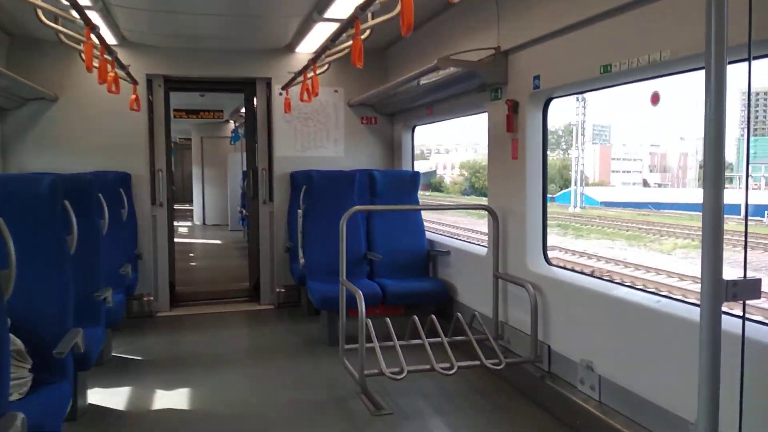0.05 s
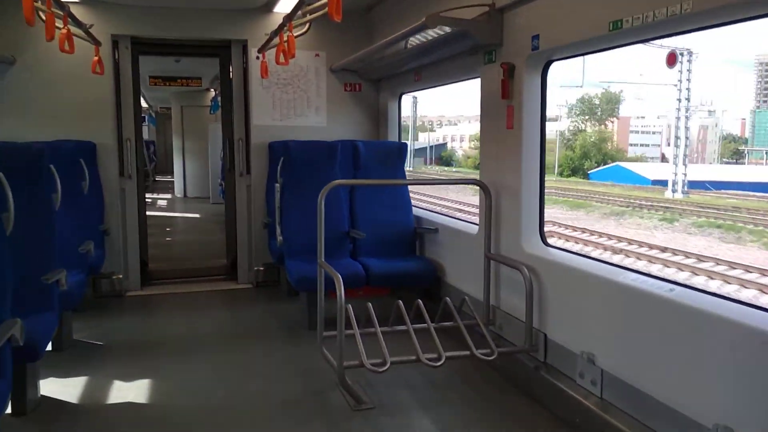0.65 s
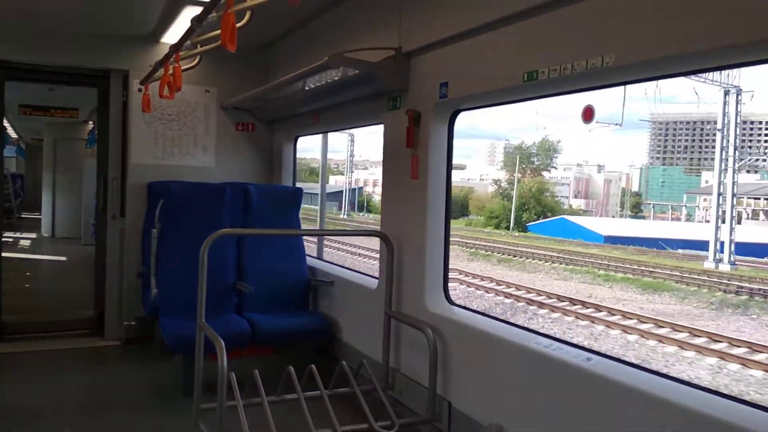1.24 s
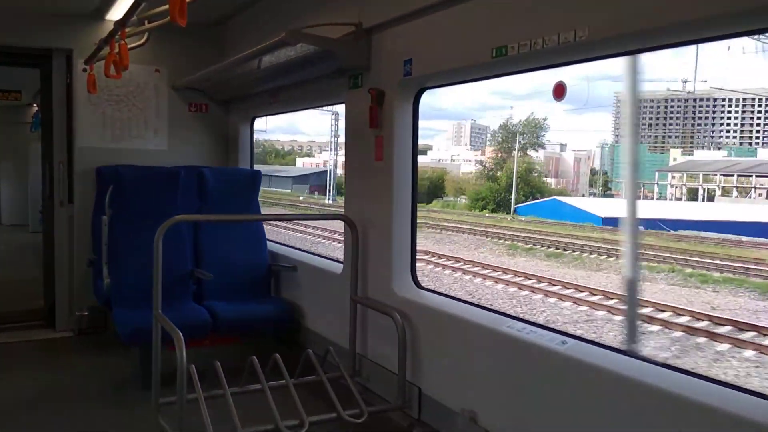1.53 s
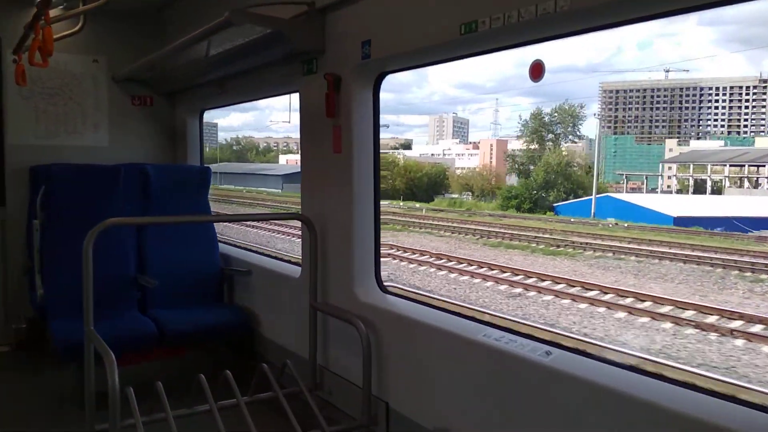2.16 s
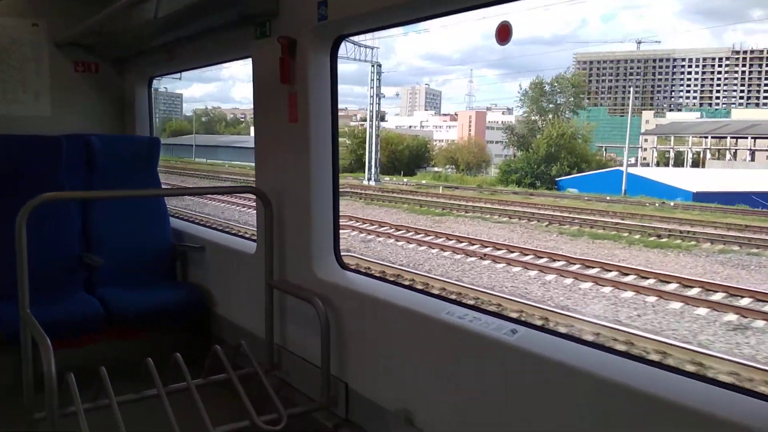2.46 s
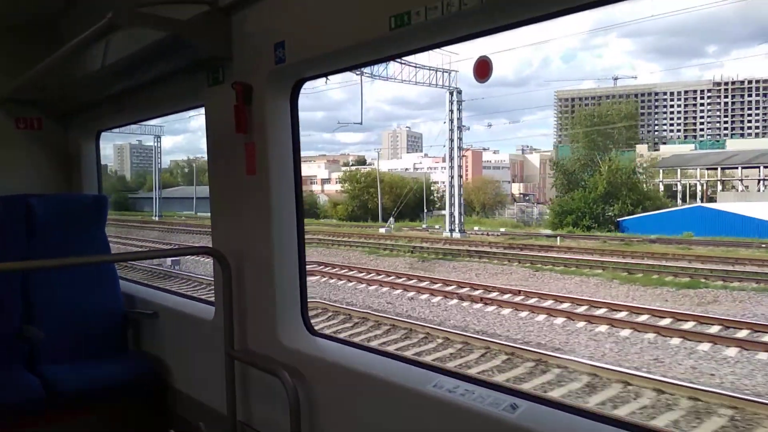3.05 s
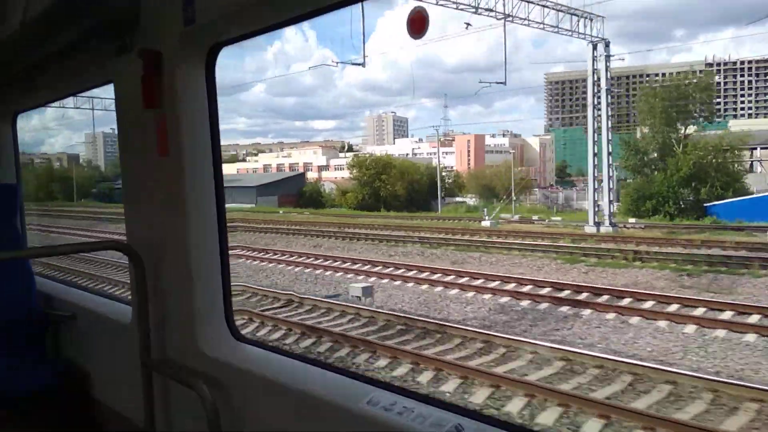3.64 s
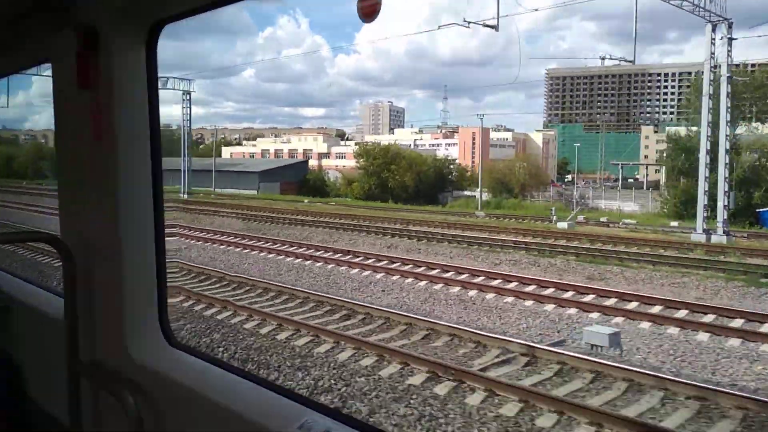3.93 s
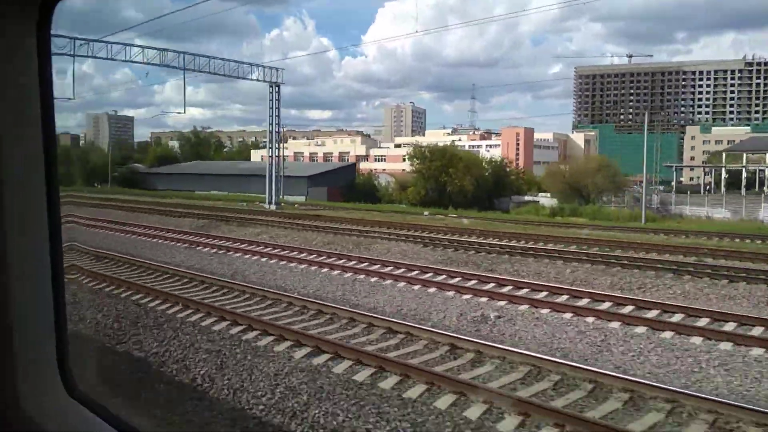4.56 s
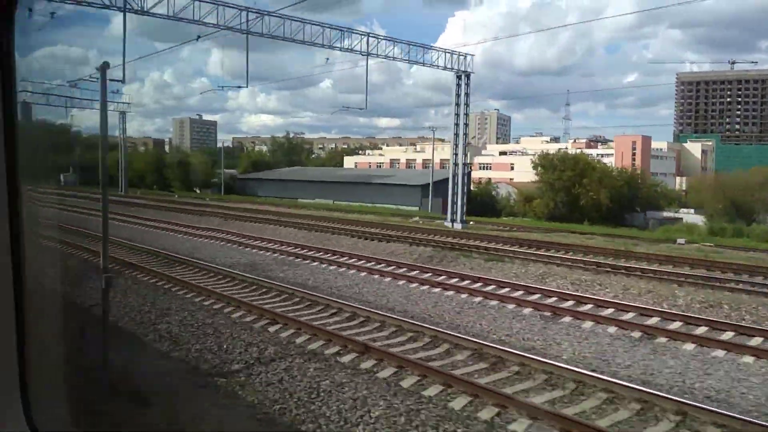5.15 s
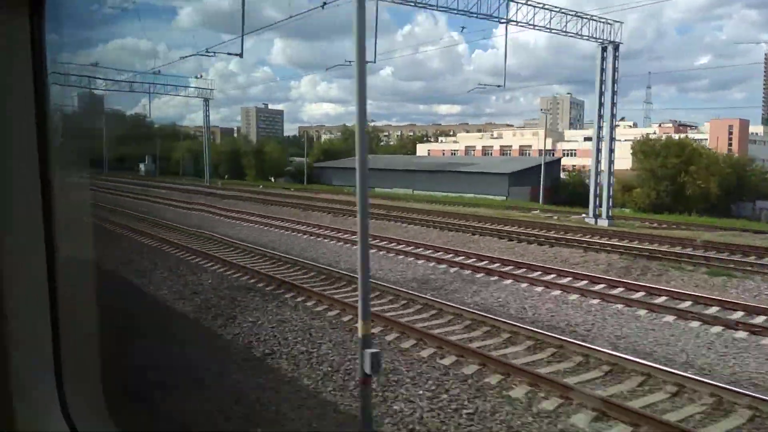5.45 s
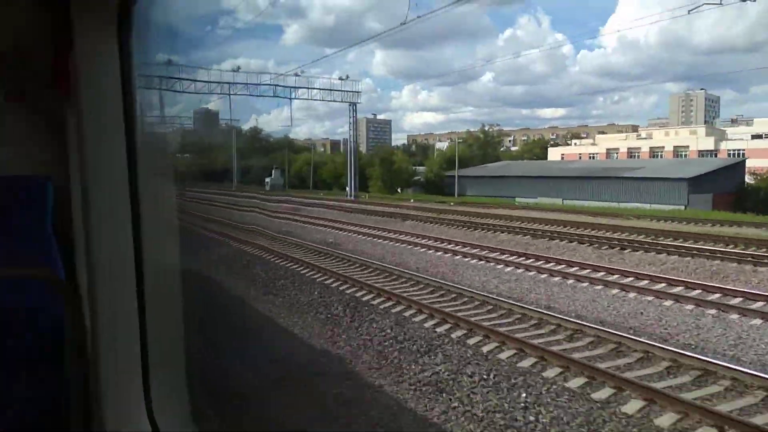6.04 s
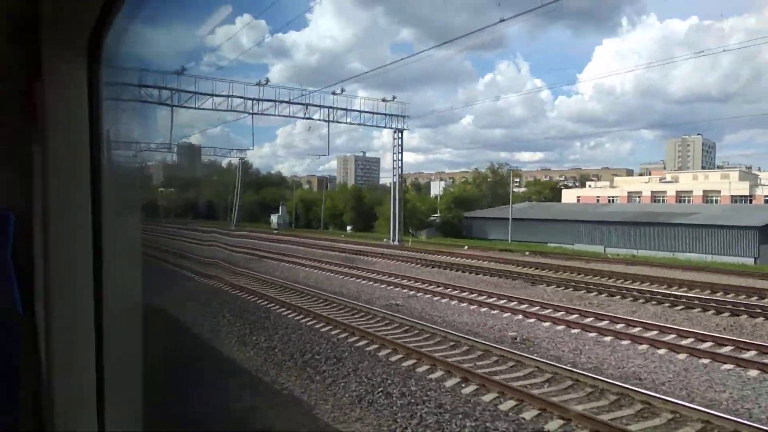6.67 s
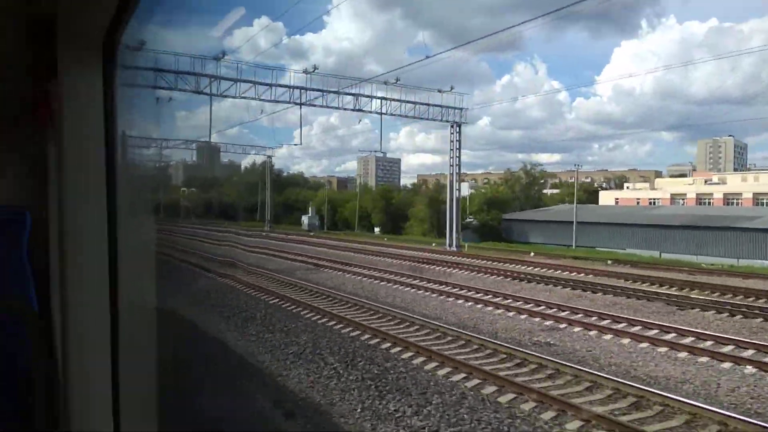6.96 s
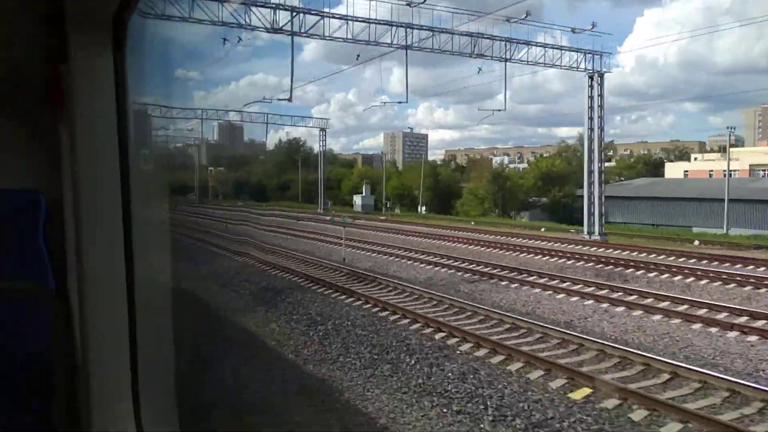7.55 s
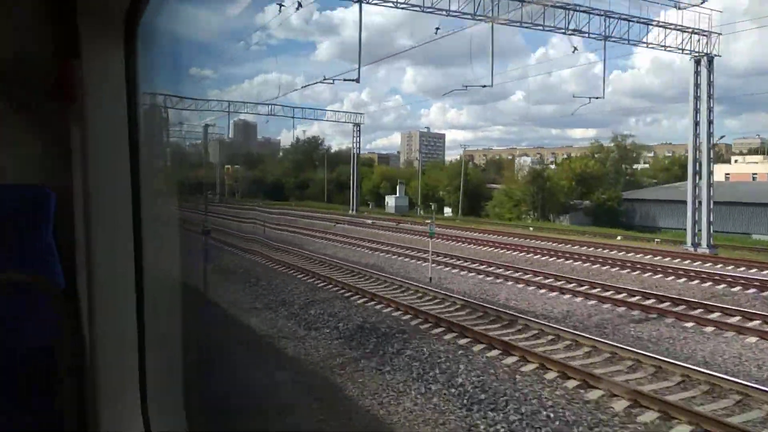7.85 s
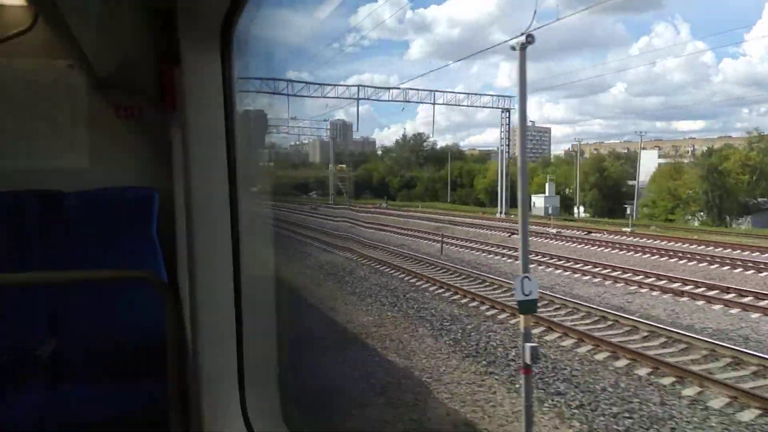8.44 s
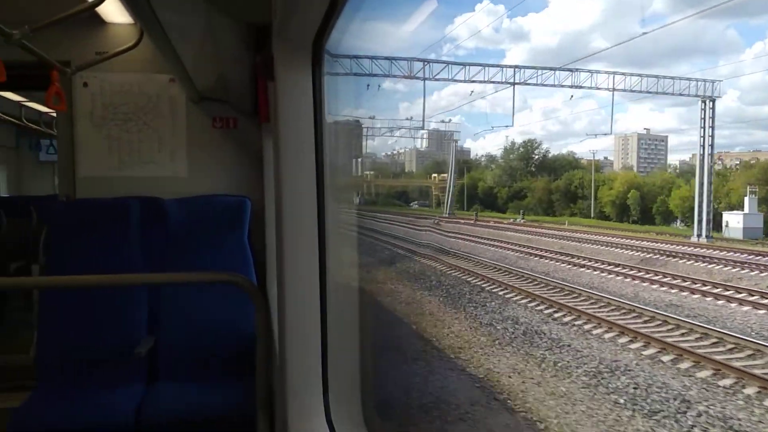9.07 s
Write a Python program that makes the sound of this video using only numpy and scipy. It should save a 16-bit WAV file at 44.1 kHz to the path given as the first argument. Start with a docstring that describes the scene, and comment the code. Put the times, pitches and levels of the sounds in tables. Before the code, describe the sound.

A deep rumble fills the carriage of a moving electric train, throbbing with quick, even wheel thuds. It starts fairly quiet in the aisle, then swells by the window, joined by a faint whine, passing panel hums and low groans. From a few seconds in, a hand and sleeve occasionally rub the microphone, with light dry clicks and one tiny nail scrape. A thin hiss stays underneath throughout.

```python
"""Worn wheels of an electric train thud once a turn into the booming car body, heard from inside.
Speed is almost steady; rail roar and gear whine swell as the microphones near the window.
The cabin groans, panels hum and the body shudders, over a thin microphone hiss.
A hand and a sleeve rub softly on the camera; a nail skids once and the casing clicks now and then."""
import sys
import numpy as np
from scipy import signal
from scipy.fft import rfft, irfft, next_fast_len
from scipy.io import wavfile
from scipy.ndimage import uniform_filter1d

SR = 44100
rng = np.random.default_rng(int(sys.argv[2]) if len(sys.argv) > 2 else 0)


def generate_wav(signal):
    """Clip the signal to [-1, 1] and save it as 16-bit WAV at the path in sys.argv[1]."""
    frames = np.transpose(np.atleast_2d(signal))
    scaled = np.clip(frames, -1, 1) * 32767
    pcm = np.round(scaled).astype(np.int16)
    wavfile.write(sys.argv[1], SR, pcm)


N = 410122
FFT_SIZE = next_fast_len(N, real=True)
TIME_S, FREQ_HZ = np.arange(N) / SR, np.fft.rfftfreq(FFT_SIZE, 1 / SR)

# wheel rotation: t/s, rate/Hz
WHEEL_SPEED = [(0, 7.782), (4, 7.734), (9.3, 7.672)]
# microphone position: t/s, nearness (0 aisle, 1 glass)
WINDOW_NEARNESS = [(0, 0), (4.7, 0.42), (6.1, 0.92), (8.1, 0.99), (8.75, 0.74), (9.3, 0.83)]
# finger strokes on the casing: t/s, rise/s, fade/s, level/dB
STROKES = [(2.628, .04, 0.06, -50.5), (2.817, .006, .028, -52), (3.28, .019, .025, -61),
           (3.48, .015, .05, -66), (3.793, .004, 0.01433, -53), (3.92, 0.0091, 0.017, -54.5),
           (4.106, .011, 0.06065, -50), (4.224, .036, 0.036, -48), (4.52, 0.055, .05, -59),
           (4.695, .005, .015, -57.5), (4.832, .012, 0.03128, -46), (4.995, .015, .04, -56),
           (5.56, .08, 0.0897, -55.5), (6.11, .015, .02, -54), (6.495, .008, .025, -51.5),
           (6.62, .13, 0.11, -60), (7.165, .06, 0.084, -49), (9.085, .06, .07, -48)]


def rolling(tread_db=-11, rail_db=-3.0, throb_db=1.22, flutter_db=1.48, swell_db=0.22):
    """Thuds, tread and rail roughness; floor, cabin air, walls and window each pass one band."""
    # floor rumble: t/s, level/dB
    rumble = [(0.1, -34), (1.8, -25), (3.3, -24.5), (4, -20), (5.2, -21), (5.9, -18.5), (6.4, -22.5),
              (7.3, -20), (7.75, -18), (8.2, -20)]
    # cabin boom: t/s, level/dB
    boom = [(0, -30), (3.85, -31.5), (4.75, -25), (5.0, -19.5), (5.85, -19.5), (7.5, -21), (8.65, -26.5),
            (9.3, -19.5)]
    turns = np.cumsum(curve(WHEEL_SPEED)) / SR
    wheels = wheel_thuds(turns) + amp(tread_db) * wheel_tread(turns)
    springs = 1 - .4 * lowpass(185, 8)
    drive = wheels + amp(rail_db) * filtered(noise(body_gain(FREQ_HZ)), springs)
    # rail load rises and falls each turn; rougher stretches swell it
    load_db = throb_db * np.cos(2 * np.pi * (turns - 0.071))
    load_db = load_db + flutter_db * drift(14) + swell_db * drift(1.7)
    near = curve(WINDOW_NEARNESS)
    roar_db = -37 + 7 * near + load_db
    rush_db = -60 + 8 * near + load_db
    levels_db = (curve(rumble) - 0.3, curve(boom) - .5, roar_db, rush_db)
    crossovers = [lowpass(edge_hz, 16) for edge_hz in (125, 200, 950)]
    bands = np.diff(crossovers, axis=0, prepend=0, append=1)
    out = np.zeros((2, N))
    for band, level_db in zip(bands, levels_db):
        part = filtered(drive, band)
        running_power = uniform_filter1d((part ** 2).mean(0), size=SR // 2)
        out += part / np.sqrt(running_power) * amp(level_db)
    return out


def wheel_thuds(turns, uneven_db=0.9):
    """Each worn spot strikes the rail once a turn, never equally hard, and rings a resonance."""
    # worn spots, each booming most at one point of the walk through the cabin:
    # place/turn, f/Hz, width/Hz, relative level/dB, peak t/s, sigma/s, lift/dB
    flats = [(.751, 84.8, 38.7, -21, 4.4, 2.1, 17.5), (.577, 77.8, 20.08, -9.5, 8.05, 1, 9),
             (.207, 105.5, 5.1, -8.5, 2.05, 0.71, 5), (.126, 152, 22.3, -12, 5.5, 0.7, 11),
             (0.03, 155.1, 12.8, -18, 5.94, 2.47, 17.5), (.437, 142.4, 6.9, -11.5, 7.3, 3.2, 5),
             (0.3, 52.2, 13, -24.5, 7.5, 3.3, 14), (.874, 187, 22.8, -25.5, 7, 2.05, 17.5),
             (.253, 79.7, 5.1, -13, 2.1, .86, 8)]
    t, out = np.arange(SR // 2) / SR, np.zeros(N)
    for place, hz, width_hz, db, peak_s, sigma_s, lift_db in flats:
        impacts = np.diff(np.floor(turns - place), prepend=np.floor(-place))
        blows = impacts * amp(uneven_db * drift(7.2))
        ring = t * np.exp(-np.pi * width_hz * t) * np.sin(2 * np.pi * hz * t)
        thuds = unit_rms(signal.oaconvolve(blows, ring)[:N])
        out += amp(db + lift_db * swell(peak_s, sigma_s)) * thuds
    return out


def wheel_tread(turns, low_hz=175, top_hz=340, points=4096):
    """Fine roughness of the running surface: one profile, repeated every turn."""
    harmonics_hz = np.arange(points // 2 + 1) * WHEEL_SPEED[1][1]
    contact = (1 - lowpass(low_hz, 8, harmonics_hz)) * lowpass(top_hz, 4, harmonics_hz)
    phasors = np.exp(2j * np.pi * rng.random(len(harmonics_hz)))
    profile = irfft(body_gain(harmonics_hz) * contact * phasors)
    return unit_rms(np.interp(turns % 1, np.arange(points) / points, profile))


def body_gain(hz):
    """Path from wheels to cabin: resonances on a falling slope."""
    # broad rolling spectrum: f/Hz, density/dB
    slope = [(15, -12.5), (28, -13), (40, -12), (70, -2), (95, 1.5), (123, -4.5), (170, -8), (300, -7.5),
             (450, -16.5), (640, -23), (930, -30), (1100, -36), (2000, -43), (3200, -62)]
    # car body and cabin air modes: f/Hz, width/Hz, gain/dB
    modes = [(52.6, 6.4, 7), (75.5, 26, 8), (109.5, 8, 10.5), (138, 19, 12), (153.7, 6.9, 14.5),
             (183, 22, 6), (213, 9.1, -0.5), (237, 14, 1.5), (358.6, 27, 4), (380.4, 12, 4.5),
             (518, 50, 4.5), (687, 14, 4.5), (716.6, 36, 7), (832, 39, 7), (879, 54, 5.5), (959, 34, 5),
             (1234, 45, 7), (1399, 60, 7), (1580, 36, 4), (1690, 60, 6), (2130, 200, 7.5)]
    modes_db = sum(db * resonance(mode_hz, width_hz, hz) for mode_hz, width_hz, db in modes)
    return amp(spectrum(slope, hz) + modes_db) * lowpass(4000, 4, hz)


def cabin_groans():
    """Fuzzy car-body resonances, a low shudder and surges of track noise swell and fade."""
    # groans: peak t/s, sigma/s, f/Hz, width/Hz, level/dB
    groans = [(.1, .35, 28, 16, -42), (6.0, .8, 249, 16, -38), (6.97, .07, 422, 20, -30),
              (6.98, .07, 462, 30, -37), (7.08, .06, 535, 50, -34.5), (7.0, .05, 900, 200, -48),
              (7.44, .07, 395, 24, -37), (7.41, .08, 520, 200, -41), (7.4, .04, 965, 14, -45),
              (5.45, .4, 515, 26, -45), (8.2, 1.0, 520, 40, -46)]
    return sum(amp(db) * swell(peak_s, sigma_s) * noise(resonance(hz, width_hz))
               for peak_s, sigma_s, hz, width_hz, db in groans)


def gear_whine(waver_hz=2.5, aisle_db=-14, spread=0.97):
    """The running gear whines through the wall, clearest at the window."""
    # tones at the glass: f/Hz, level/dB
    whines = [(361, -46.5), (505, -45), (520, -46.5), (669, -55.5), (722, -52), (826, -56), (869, -59.5),
              (901, -60)]
    out = np.zeros((2, N))
    for hz, db in whines:
        mid, side = tone(hz, waver_hz), spread * tone(hz, waver_hz)
        out += amp(db) * unit_rms(np.array([mid + side, mid - side]))
    return out * amp(aisle_db * (1 - curve(WINDOW_NEARNESS)))


def panel_hums(waver_hz=1.8):
    """Carriage panels sing for a moment."""
    # hums: peak t/s, sigma/s, f/Hz, level/dB
    hums = [(0.246, 0.27, 329.5, -42.5), (.4, 0.71, 210, -45.5), (1.65, 0.16, 391, -42),
            (2.952, 0.32, 359.8, -40.5), (3.8, .3, 239.2, -36.5), (4.15, 0.16, 726, -50.5),
            (5.35, .25, 360.5, -39), (6.3, .24, 362.3, -38), (8.4, 0.19, 285.3, -33),
            (9.22, .12, 246.1, -29.5)]
    return sum(amp(db) * swell(peak_s, sigma_s) * tone(hz, waver_hz) for peak_s, sigma_s, hz, db in hums)


def body_sway(aisle_db=-47.0, near_db=2.5, low_hz=15, top_hz=44):
    """The car body shudders on its springs, more strongly beside the wall."""
    band = FREQ_HZ / (FREQ_HZ + low_hz) * lowpass(top_hz, 8)
    return amp(aisle_db + near_db * curve(WINDOW_NEARNESS)) * noise(band)


def finger_rubs(grain_db=0.8):
    """Skin slides over the casing in short strokes."""
    # skin friction: f/Hz, density/dB
    skin = [(800, -10), (2000, 0.5), (3200, -9), (5000, -10.5), (7500, -7), (9300, -5.5), (11000, 0.5),
            (12500, 1), (15500, -3)]
    envelope = np.zeros(N)
    for start_s, rise_s, fade_s, db in STROKES:
        attack = np.clip((TIME_S - start_s) / rise_s, 0, 1)
        envelope += amp(db) * attack * decay(start_s + rise_s, fade_s, tail_db=-24, tail_s=.12)
    return envelope * amp(grain_db * drift(150)) * friction_noise(skin)


def nail_skid(start_s=5.841, rise_s=.006, hold_s=.014, level_db=-41.5, slip_hz=170, chatter_db=1.5):
    """A nail sticks and slips on the casing; a close reflection makes it hollow and metallic."""
    # nail friction: f/Hz, density/dB
    nail = [(800, -4), (1800, -1), (3300, -5), (5000, -8), (7500, -4), (9000, -4.5), (10600, 4), (12200, 1),
            (15500, -3.5)]
    attack = np.clip((TIME_S - start_s) / rise_s, 0, 1)
    envelope = attack * decay(start_s + rise_s + hold_s, fade_s=0.028, tail_db=-13, tail_s=.05)
    slips = np.cumsum(slip_hz * (1 + .3 * drift(100))) / SR
    chatter = unit_rms(.5 - slips % 1)
    echo_gain, echo_s = .92, .001238
    comb = abs(1 + echo_gain * np.exp(-2j * np.pi * FREQ_HZ * echo_s)) ** 1.5
    return amp(level_db + chatter_db * chatter) * envelope * noise(amp(spectrum(nail)) * comb)


def grip_rustle(rest_db=-69, stroke_db=-64.5, settle_s=.3, slips_per_s=25, slip_s=.003):
    """Fingers rustle on the casing with tiny slips, most around each stroke."""
    # grip friction: f/Hz, density/dB
    creak = [(1000, -13.5), (5000, -16), (6800, -7.5), (9000, -9.5), (11000, 0), (13000, -3),
             (15500, -15.5)]
    impulses = (rng.random(N) < slips_per_s / SR) * rng.uniform(.4, 1, N)
    slips = unit_rms(signal.lfilter([1], [1, -np.exp(-1 / (slip_s * SR))], impulses))
    friction = amp(-6 + 2.0 * drift(12)) + amp(-14) * slips
    shifting = sum(np.exp(-abs(TIME_S - start_s - rise_s) / settle_s) for start_s, rise_s, *_ in STROKES)
    pressure = np.sqrt(amp(rest_db) ** 2 + amp(stroke_db) ** 2 * shifting)
    return friction * pressure * friction_noise(creak)


def sleeve_brush(grain_db=2.0):
    """Cloth scrapes grittily over the casing."""
    # brushes: t/s, level/dB
    brushes = [(2.4, -83), (2.66, -56.5), (3.0, -63), (3.15, -81), (4.09, -80), (4.115, -63), (4.165, -54),
               (4.21, -61), (4.235, -54), (4.29, -57), (4.37, -80.5), (7.14, -80), (7.185, -58),
               (7.26, -52), (7.38, -79), (9.0, -82), (9.13, -47), (9.22, -45.5), (9.3, -46)]
    # cloth friction: f/Hz, density/dB
    cloth = [(500, 0.5), (1200, 10), (2300, 4.5), (3500, -5), (4600, -9.5), (5600, -4.5), (7000, -7),
             (11000, -8), (15500, -19)]
    return amp(curve(brushes) + grain_db * drift(160)) * friction_noise(cloth)


def casing_clicks():
    """The casing gives dry clicks as the grip shifts."""
    # clicks: t/s, level/dB, f/Hz, width/Hz, fade/s
    clicks = [(2.782, -44, 1900, 1800, 0.0046), (2.788, -48.5, 2700, 2400, 0.0024),
              (2.823, -47, 11200, 2000, .007), (4.115, -56, 6060, 500, 0.0063),
              (4.148, -50, 5000, 6500, .008), (4.227, -45.5, 1690, 2000, .007),
              (4.958, -54, 12000, 2500, .005), (5.053, -45.5, 2191, 1910, 0.006),
              (5.087, -50, 11800, 3000, .006), (5.213, -53, 12000, 2500, .006),
              (6.5, -57, 3020, 5000, .012)]
    out = np.zeros((2, N))
    for start_s, db, hz, width_hz, fade_s in clicks:
        envelope = (TIME_S >= start_s) * decay(start_s, fade_s, tail_db=-13, tail_s=.035)
        out += amp(db) * envelope * noise(resonance(hz, width_hz))
    return out


def friction_noise(colour, depth_db=3.5, step_hz=110):
    """Friction noise with a random, ragged colouring."""
    grid_hz = np.arange(0, SR / 2, step_hz)
    ripple_db = depth_db * np.interp(FREQ_HZ, grid_hz, rng.standard_normal(len(grid_hz)))
    return noise(amp(spectrum(colour) + ripple_db))


def mic_hiss(level_db=-57):
    """Thin, steady microphone hiss with a bright peak around 10-13 kHz."""
    # self-noise: f/Hz, density/dB
    hiss = [(200, 4), (900, 14), (1500, 15), (2200, 10.5), (3000, 4.5), (5000, -2.5), (6800, -1),
            (9000, -5), (10600, 1), (12000, 4.5), (14000, -10), (15700, -11.5)]
    return amp(level_db + .5 * drift(6.7)) * noise(amp(spectrum(hiss)))


def noise(gain):
    """Coloured stereo noise, rms 1: alike in the bass, unrelated in the treble."""
    # left-right likeness: f/Hz, correlation
    likeness = [(50, 1), (130, 0.87), (260, 0.8), (500, 0.94), (800, 0.58), (1200, -0.071), (2000, -0.077),
                (4000, -0.051)]
    correlation = spectrum(likeness)
    a, b = rfft(rng.standard_normal((2, FFT_SIZE)))
    mid, side = a * np.sqrt(1 + correlation), b * np.sqrt(1 - correlation)
    return unit_rms(irfft(np.array([mid + side, mid - side]) * gain, FFT_SIZE)[:, :N])


def tone(hz, waver_hz, flicker_db=2.0):
    """Sine wavering in pitch and level, rms 1."""
    cycles = np.cumsum(hz + waver_hz * drift(3.984)) / SR
    return unit_rms(np.sin(2 * np.pi * cycles) * amp(flicker_db * drift(9.5)))


def drift(rate_hz):
    """Smooth random curve, rms 1."""
    return unit_rms(filtered(rng.standard_normal(N), np.exp(-(FREQ_HZ / rate_hz) ** 2)))


def decay(start_s, fade_s, tail_db, tail_s):
    """Flat until start_s, then an exponential fade with a quieter tail."""
    age_s = np.maximum(TIME_S - start_s, 0)
    return np.exp(-age_s / fade_s) + amp(tail_db) * np.exp(-age_s / tail_s)


def swell(peak_s, sigma_s):
    return np.exp(-((TIME_S - peak_s) / sigma_s) ** 2 / 2)


def curve(rows):
    return np.interp(TIME_S, *np.transpose(rows))


def spectrum(rows, hz=FREQ_HZ):
    """Interpolates on a log-frequency axis."""
    points_hz, values = np.transpose(rows)
    return np.interp(np.log(hz + 1), np.log(points_hz + 1), values)


def resonance(centre_hz, width_hz, hz=FREQ_HZ):
    return 1 / (1 + ((hz - centre_hz) / (width_hz / 2)) ** 2)


def lowpass(edge_hz, order, hz=FREQ_HZ):
    return 1 / (1 + (hz / edge_hz) ** order)


def filtered(x, gain):
    return irfft(rfft(x, FFT_SIZE) * gain, FFT_SIZE)[..., :N]


def balance(left_minus_right_db):
    return amp(np.outer([.5, -.5], left_minus_right_db))


def unit_rms(x):
    return x / np.sqrt(np.mean(x ** 2) + 1e-20)


def amp(db):
    return 10 ** (np.asarray(db) / 20)


def scene():
    """Train, microphone hiss and handling noise, in stereo."""
    # microphones turning from aisle to window: t/s, left minus right/dB
    turning = [(1.3, -2.5), (4.1, 0.5), (6, 0.5)]
    train = rolling() + cabin_groans() + gear_whine() + panel_hums() + body_sway()
    hiss = mic_hiss()
    handling = finger_rubs() + nail_skid() + grip_rustle() + sleeve_brush() + casing_clicks()
    return train * balance(curve(turning)) + hiss + handling


def record(dry, edge_hz=15700):
    """Each microphone's own colour, then the band limit."""
    # microphone colour: f/Hz, left minus right/dB
    mismatch = [(60, 0.1), (250, 0.5), (600, 1), (1100, 0), (2200, 0), (4000, -5), (7000, -1), (10000, -4),
                (12500, 1.5), (15000, 3.5)]
    coloured = filtered(dry, balance(spectrum(mismatch)))
    taps = signal.firwin(511, edge_hz, window=("kaiser", 9), fs=SR)
    return signal.oaconvolve(coloured, taps[None], "same")


dry = scene()
out = record(dry)
generate_wav(out)
```